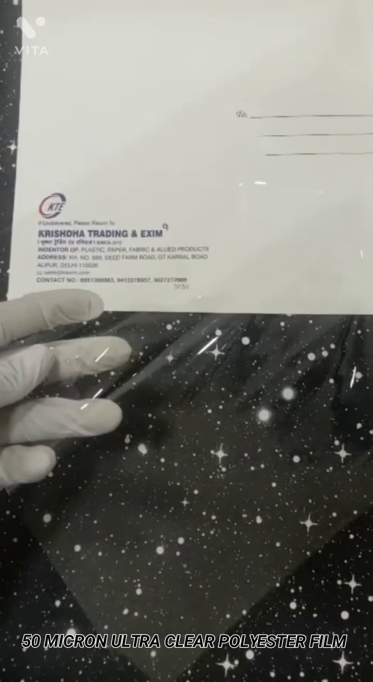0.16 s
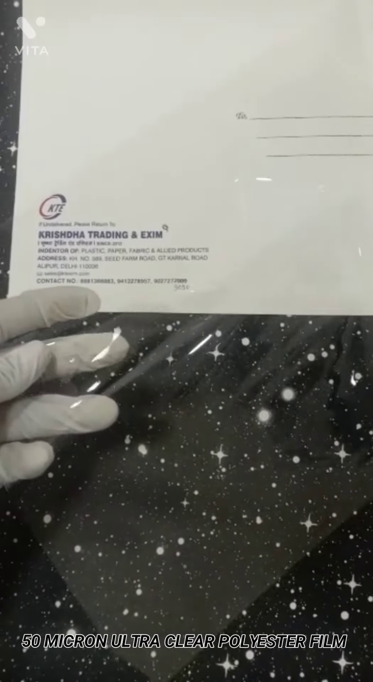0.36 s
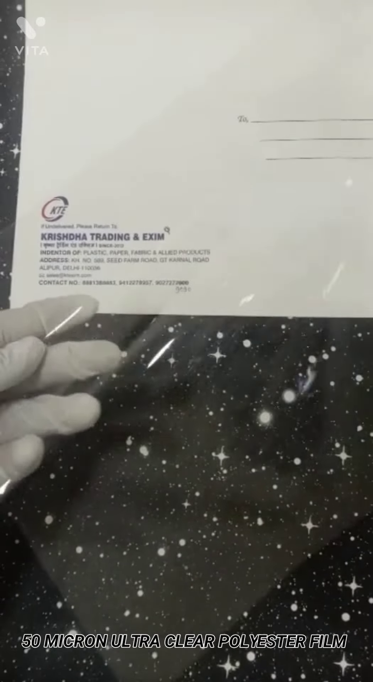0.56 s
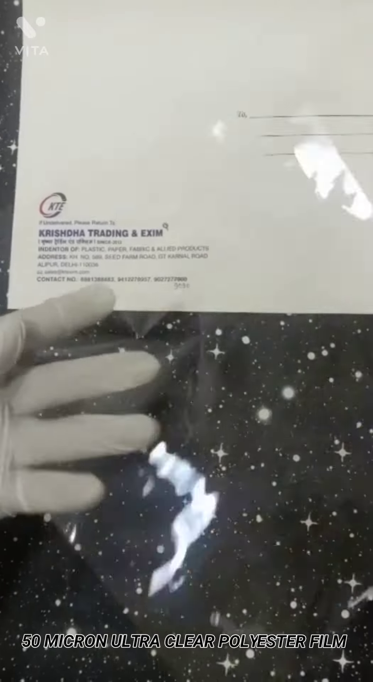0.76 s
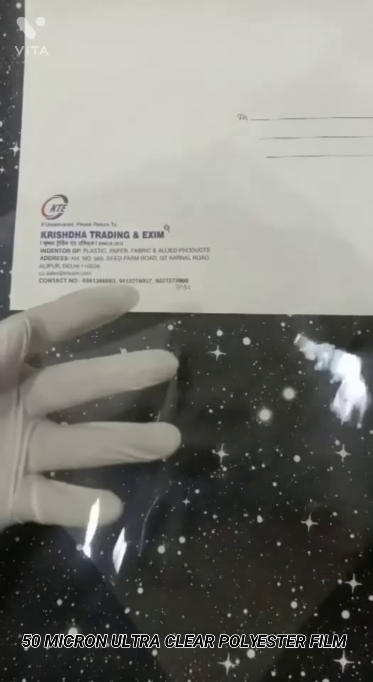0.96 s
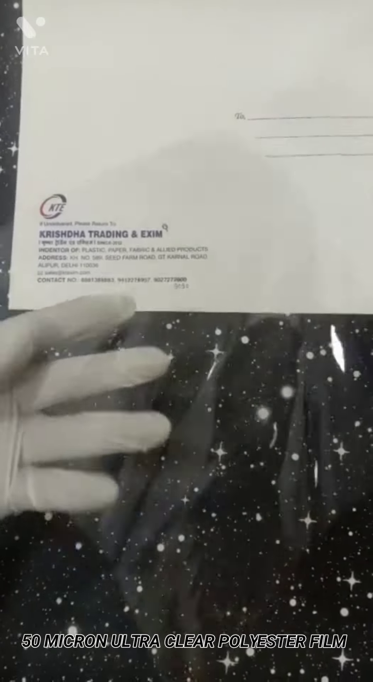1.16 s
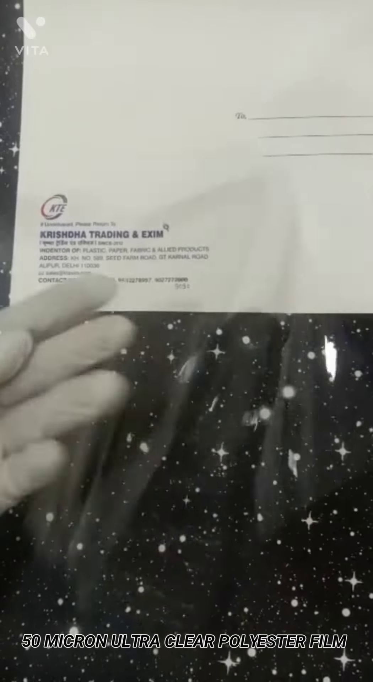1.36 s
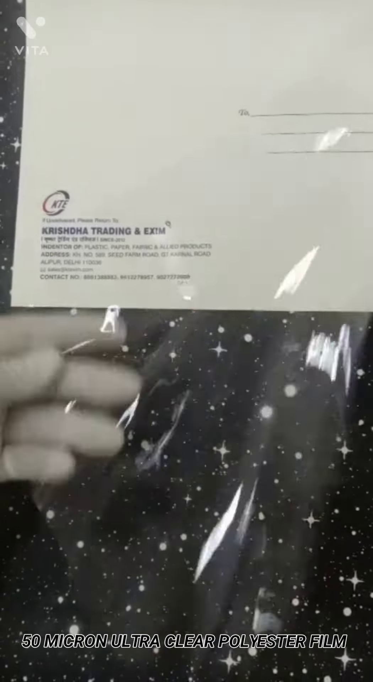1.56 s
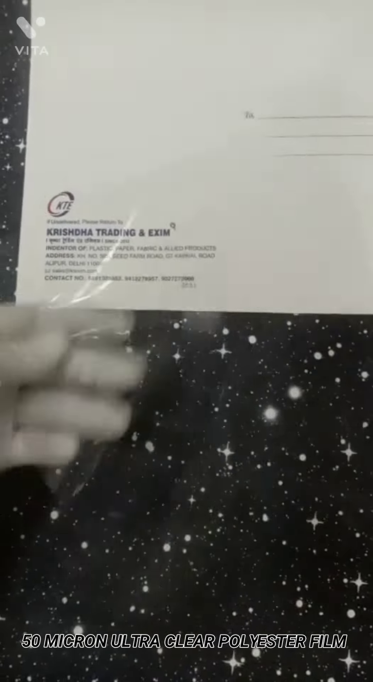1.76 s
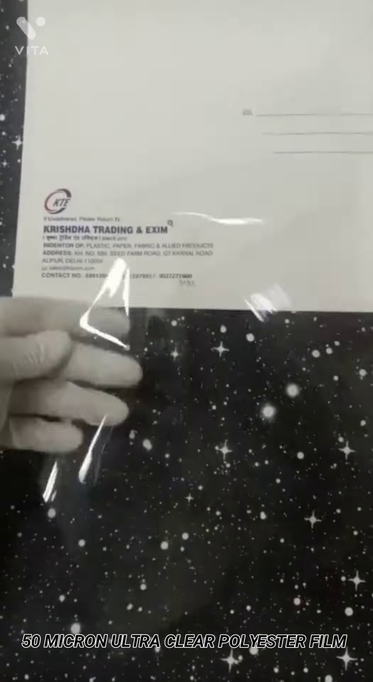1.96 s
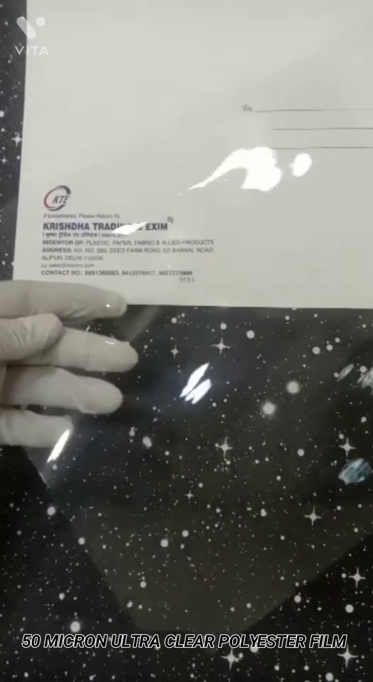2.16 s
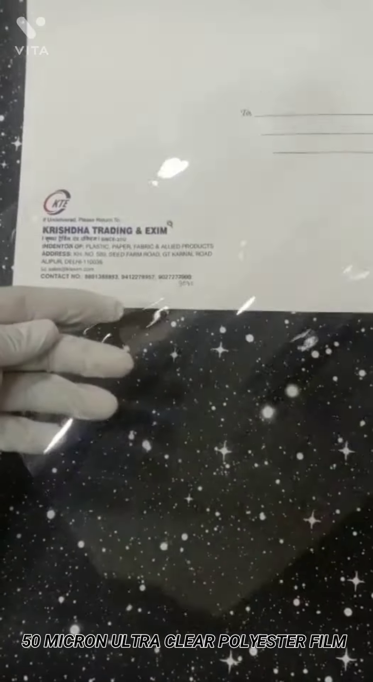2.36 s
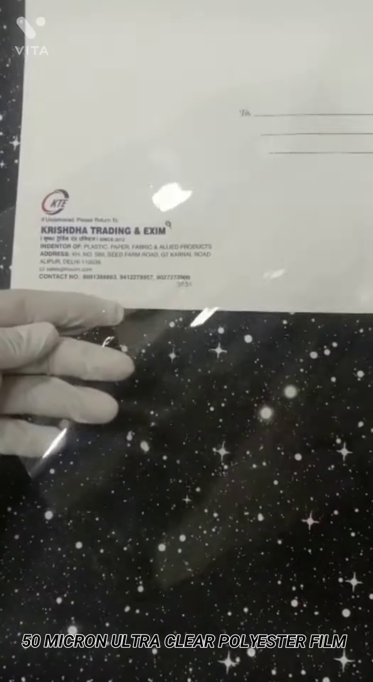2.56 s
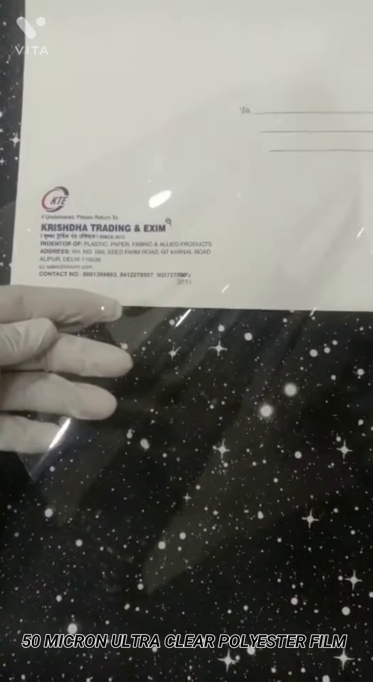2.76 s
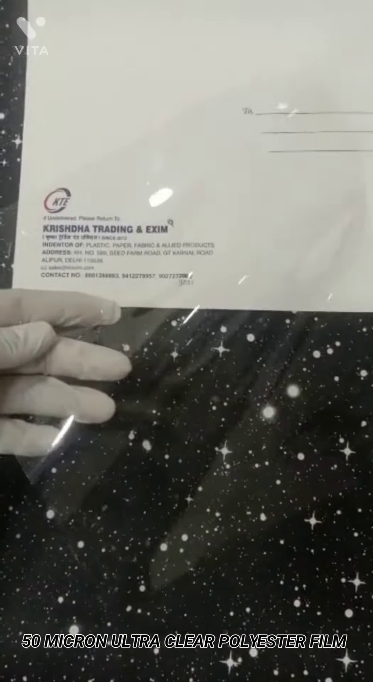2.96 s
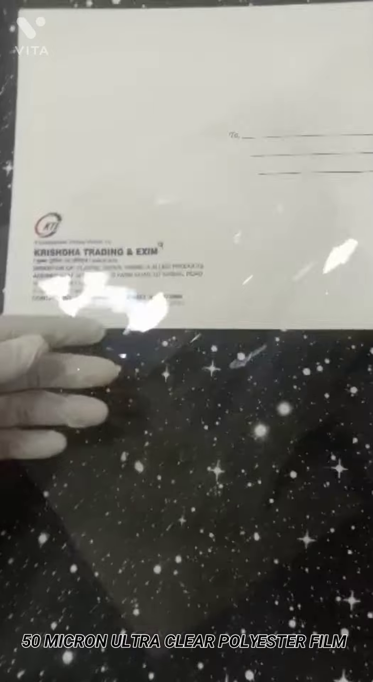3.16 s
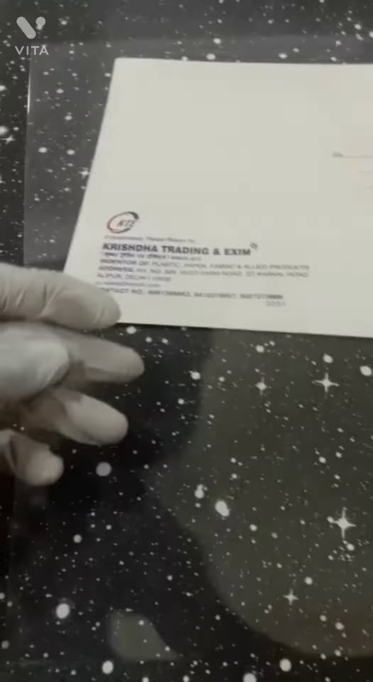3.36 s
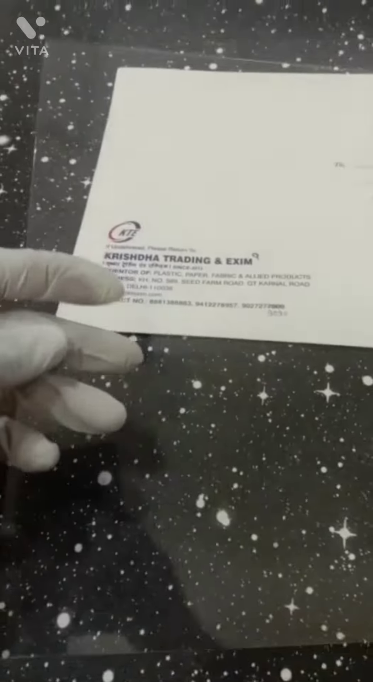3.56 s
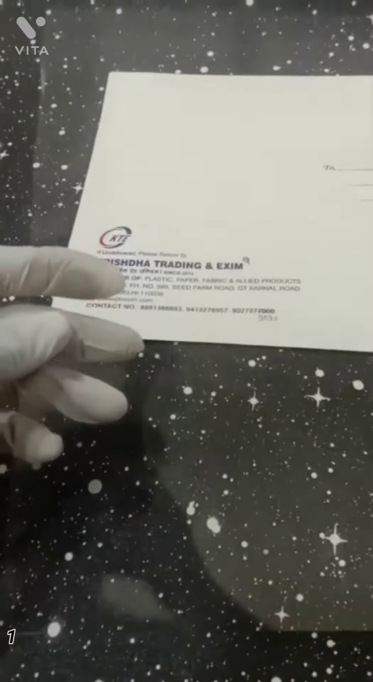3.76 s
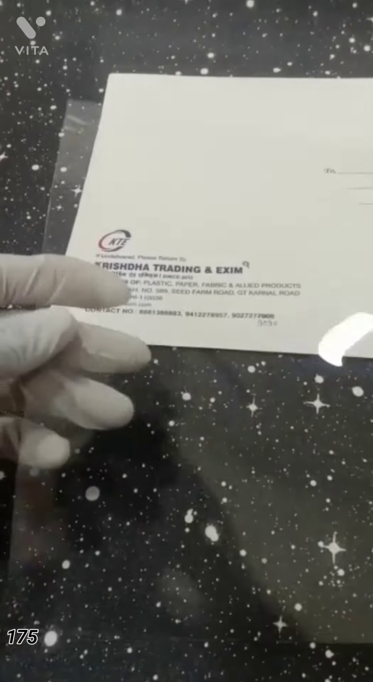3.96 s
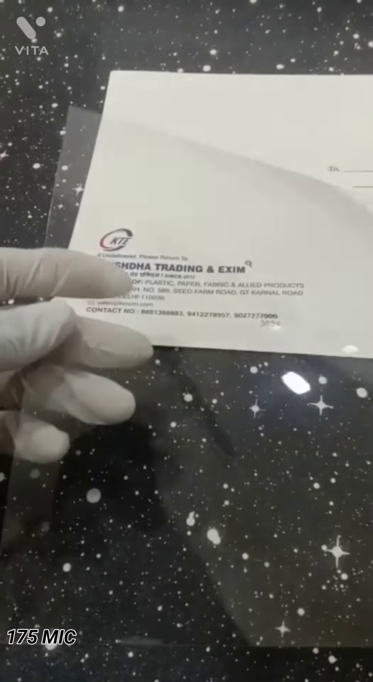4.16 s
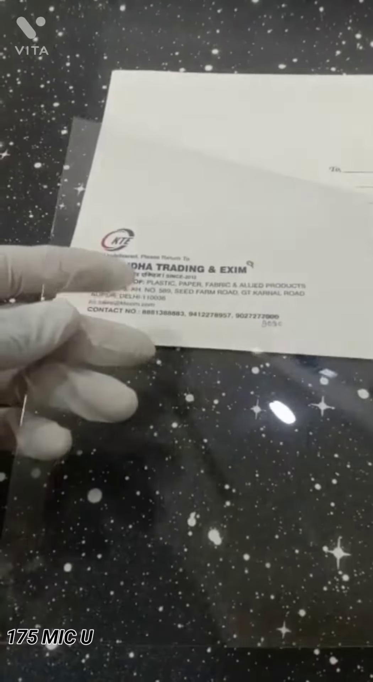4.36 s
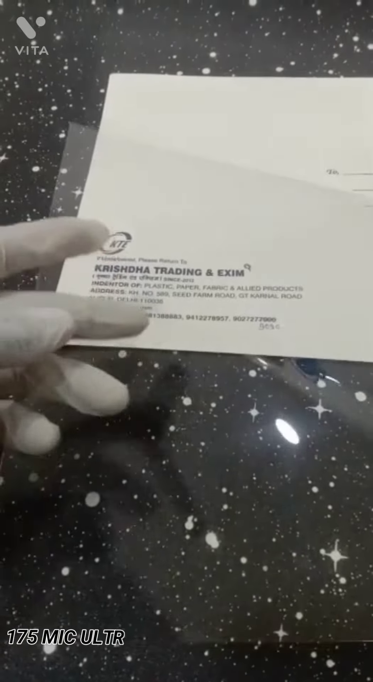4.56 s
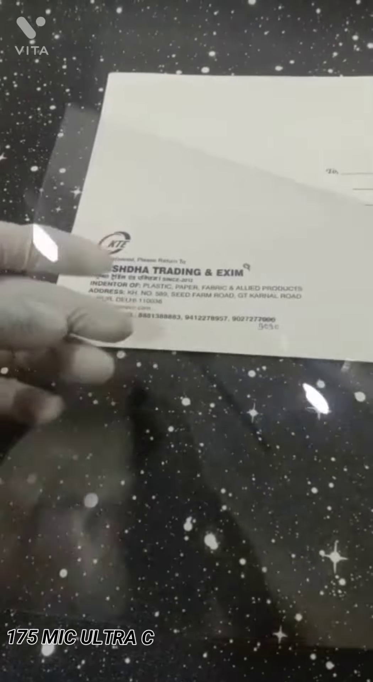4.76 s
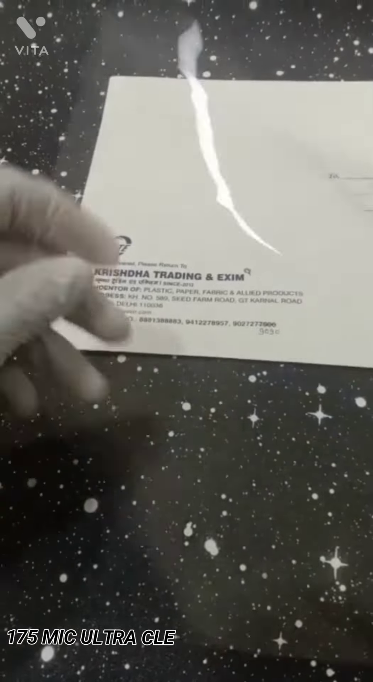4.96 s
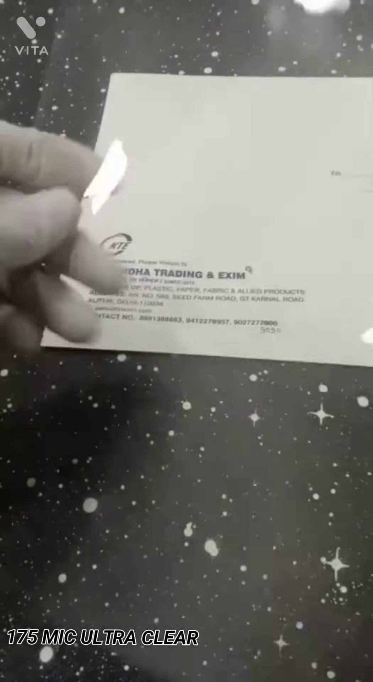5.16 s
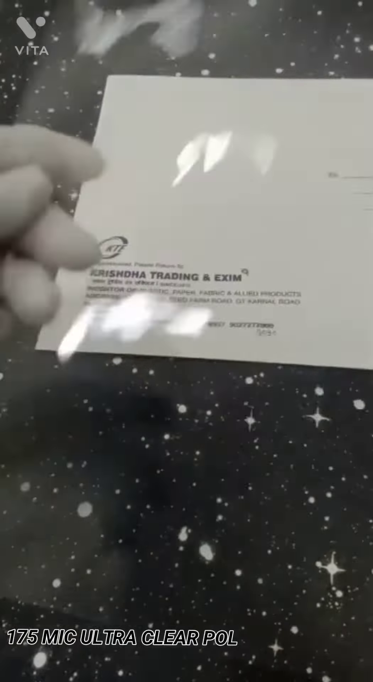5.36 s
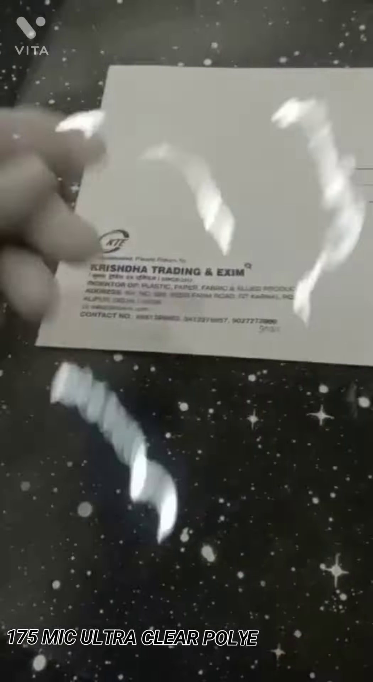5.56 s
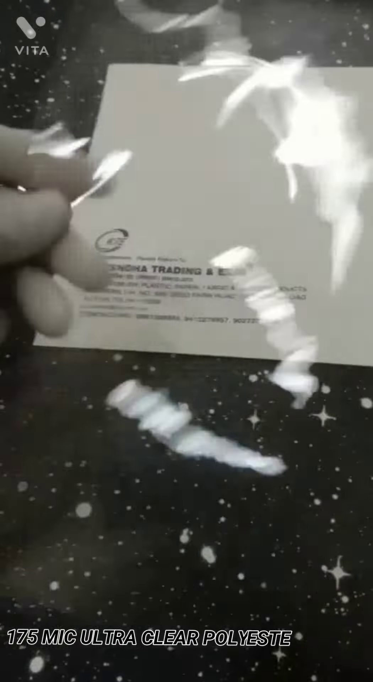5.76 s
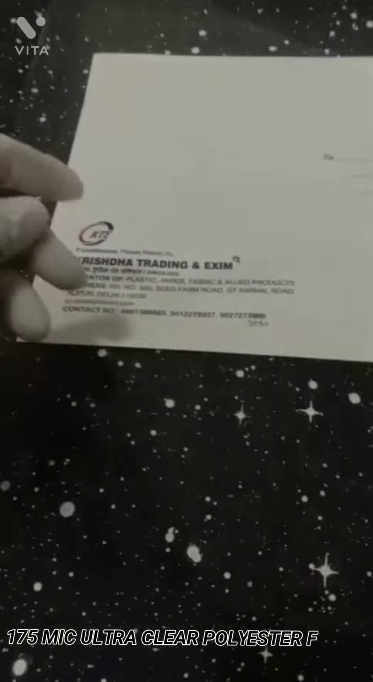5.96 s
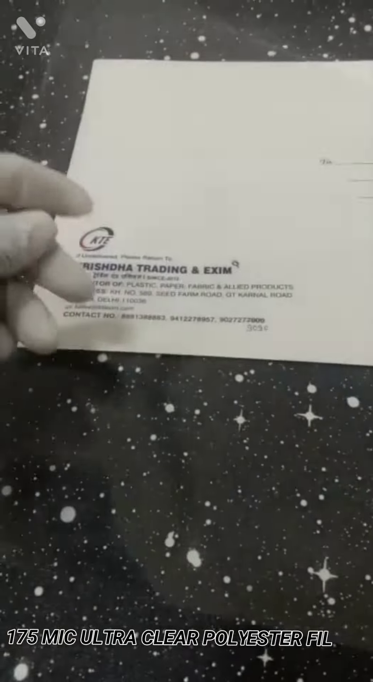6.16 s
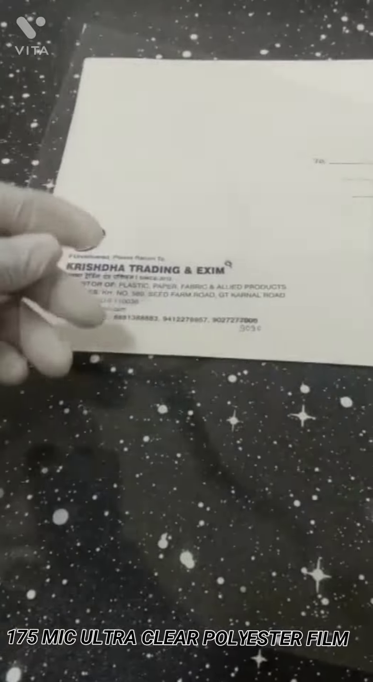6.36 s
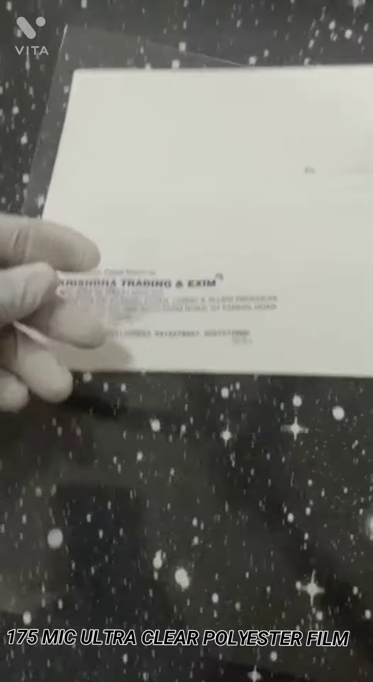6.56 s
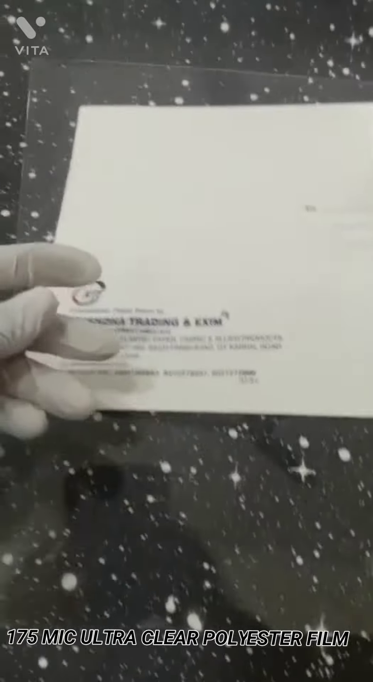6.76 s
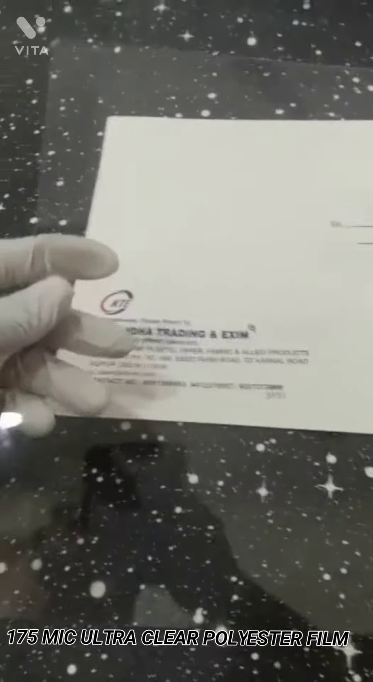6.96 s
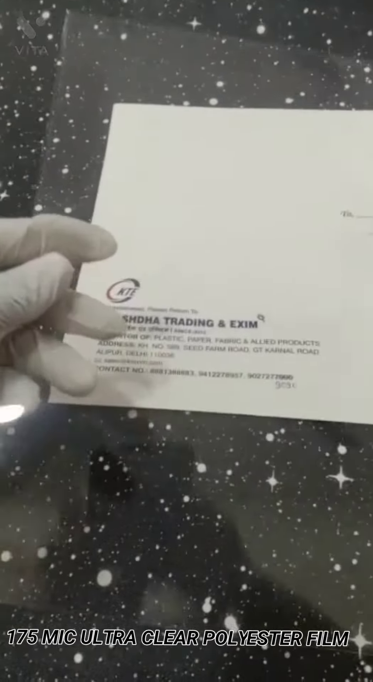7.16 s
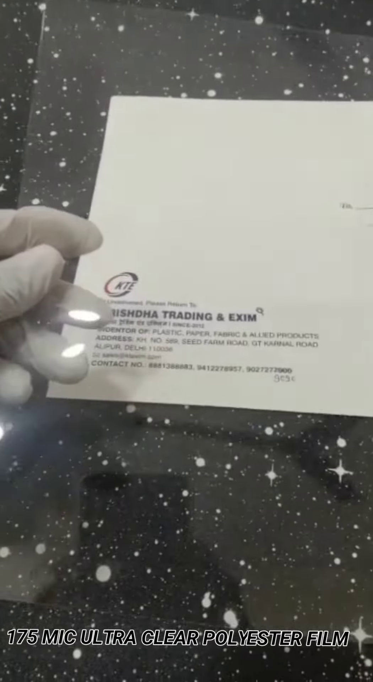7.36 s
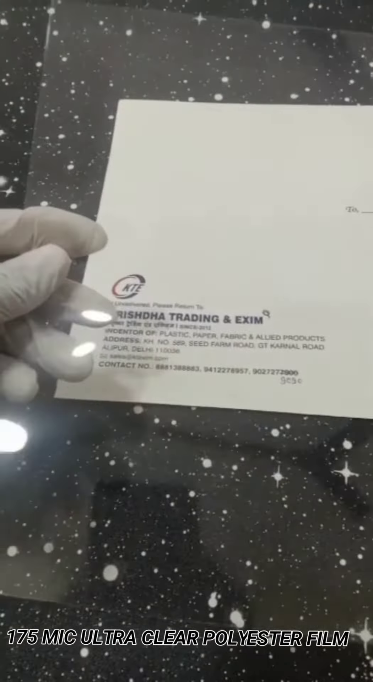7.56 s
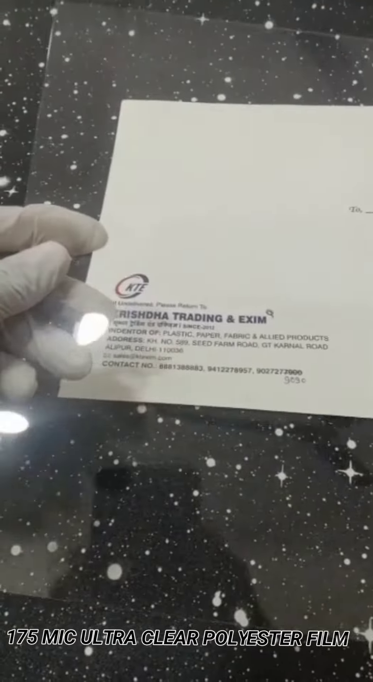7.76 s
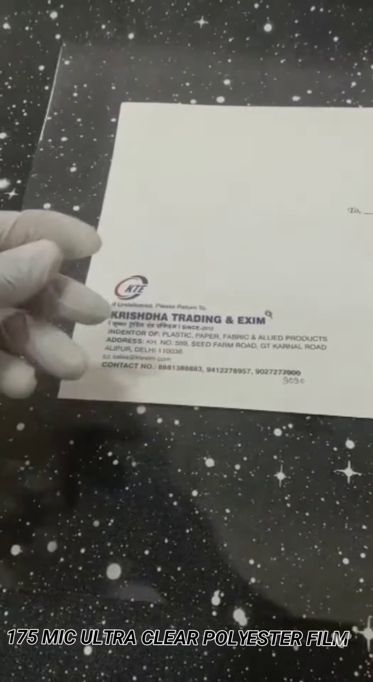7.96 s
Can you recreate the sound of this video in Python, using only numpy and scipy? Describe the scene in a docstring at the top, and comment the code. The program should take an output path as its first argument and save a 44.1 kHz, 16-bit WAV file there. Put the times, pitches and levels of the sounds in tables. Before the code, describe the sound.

Thin clear plastic film crinkles in bright snaps over a slowing engine and low rumble, then a thicker sheet buckles with loud, dull cracks.

```python
"""A gloved hand flexes clear polyester sheets in a bare, echoing room with traffic outside.
First an engine slows down over a droning rumble while a thin sheet crinkles in bright snaps of filtered
grains; after a brief silence the room fades back in, with the rumble but no engine. Fingers brush and slip
softly, then a thick sheet buckles in loud, duller cracks. Faint slips of the glove end the scene."""
import sys
import numpy as np
from scipy import signal
from scipy.fft import rfft, irfft
from scipy.io import wavfile

SR = 44100
rng = np.random.default_rng(int(sys.argv[2]) if len(sys.argv) > 2 else 0)


def dump_mix(stems):
    """Bounce the given channels to the path in sys.argv[1] as a 16-bit WAV at rate SR."""
    frames = np.atleast_2d(stems).T  # one column per channel
    limited = np.clip(frames, -1, 1)  # hard clip at full scale
    pcm = np.round(limited * 32767).astype(np.int16)
    wavfile.write(sys.argv[1], SR, pcm)


N = 353241
TIME = np.arange(N) / SR

# silence between the thin and the thick sheet: start/s, end/s
GAP_S = (3.187, 3.3)
# colour of the thin sheet: f/Hz, density/(dB per Hz)
THIN_COLOUR = [(150, -48.5), (280, -18), (540, -12), (1100, -11), (1300, -9.5), (1790, -10), (2700, -8),
               (3830, -7), (6500, -11), (8300, -18.5), (10800, -31), (13500, -36), (15500, -23)]
# colour of the thick sheet: f/Hz, density/(dB per Hz)
THICK_COLOUR = [(40, -57.5), (120, -32), (190, -24.5), (375, -13), (520, -14.5), (860, -13), (1240, -6),
                (1620, -9.5), (2440, -7.5), (3600, -13.5), (5900, -23.5), (8000, -39.5), (9800, -50.5),
                (15500, -61)]
# colour of the finest grains: f/Hz, density/(dB per Hz)
SIZZLE_COLOUR = [(5000, -31.5), (7500, 2), (10500, 1), (13500, -7), (15500, -0.5)]
# low modes of the room: f/Hz, width/Hz, level/dB
ROOM_MODES = [(126, 14, -1), (162, 12, 0), (183, 12, -3), (201, 12, 1), (245, 50, -14)]


def from_db(db):
    """Decibels to gain."""
    return 10 ** (np.asarray(db) / 20)


def rms_one(x):
    """Scale to unit power."""
    return x / np.sqrt(np.mean(x ** 2) + 1e-20)


def in_time(rows):
    """Each column of a curve at every sample."""
    s, *columns = np.transpose(rows)
    return [np.interp(TIME, s, column) for column in columns]


def at_hz(points, hz):
    """Read a table on a log-frequency axis."""
    f, value = np.transpose(points)
    return np.interp(np.log(np.maximum(hz, 1)), np.log(f), value)


def butter(x, hz, kind, order=2):
    """Butterworth filter."""
    return signal.sosfilt(signal.butter(order, hz, kind, fs=SR, output="sos"), x)


def resonate(x, modes):
    """Sum of parallel resonances (f/Hz, width/Hz, level/dB)."""
    return sum(from_db(db) * signal.lfilter(*signal.iirpeak(hz, hz / width, fs=SR), x)
               for hz, width, db in modes)


def drift(per_s, size=N):
    """Random wander of unit power, with per_s new targets a second."""
    knots = rng.standard_normal(4096)
    return rms_one(np.interp(TIME[:size] * per_s, np.arange(len(knots)), knots))


def colour(x, spectrum, tilt_db=0, hinge_hz=1500, top_hz=7500, size=4096):
    """Causal minimum-phase filter; between hinge and top the spectrum tilts by tilt_db per kHz."""
    hz = np.arange(size // 2 + 1) * SR / size
    tilt = tilt_db * (np.clip(hz, hinge_hz, top_hz) - hinge_hz) / 1000
    cepstrum = irfft(np.log(from_db(at_hz(spectrum, hz) + tilt)))
    # folding the cepstrum onto positive time gives minimum phase
    cepstrum[1:size // 2] *= 2
    cepstrum[size // 2 + 1:] = 0
    impulse_response = irfft(np.exp(rfft(cepstrum)))
    return signal.fftconvolve(x, impulse_response)[:len(x)]


def add(track, s, sound):
    """Mix a sound in at time s."""
    start = max(round(s * SR), 0)
    track[start:start + len(sound)] += sound[:N - start]


def swell(s, rise, fall):
    """A bell-shaped rise to 1 at time s, then an exponential fall."""
    steepness = np.where(TIME < s, ((TIME - s) / rise) ** 2, (TIME - s) / fall)
    return np.exp(-np.minimum(steepness, 30))


def late_swell(t, peak_s):
    """A rise to 1 at peak_s, then a slower decay."""
    return t / peak_s * np.exp(1 - t / peak_s)


def grains(per_s, spread_db, size):
    """Tiny creases give way at random times, with random strength and sign."""
    strength = from_db(spread_db * np.minimum(rng.exponential(1, size), 3))
    sign = rng.choice([-1, 1], size)
    return strength * sign * (rng.random(size) < per_s / SR)


def background(hiss_db=-69.0, early_whine_db=-68.0, late_whine_db=-82.5, waver_db=7.0):
    """Coloured room hiss with a faint whine: wavering noise bands, stronger before the gap."""
    # colour of the quiet room: f/Hz, density/(dB per Hz)
    hiss_colour = [(18, -54.5), (30, -17.5), (123, -1.5), (520, -11), (760, -19), (1260, -21), (1680, -27),
                   (3590, -22.5), (6890, -46.5), (9000, -52.5), (15500, -46.5)]
    # bands of the whine: f/Hz, width/Hz, level/dB
    whine_modes = [(1270, 47, 3.5), (1860, 70, -4), (2570, 160, -4.5), (3470, 180, -7.5)]
    hiss = rms_one(colour(rng.standard_normal(N), hiss_colour))
    air = rng.standard_normal(N)
    whine = sum(resonate(air, [mode]) * from_db(waver_db * drift(35)) for mode in whine_modes)
    whine_db = np.where(TIME < GAP_S[0], early_whine_db, late_whine_db)
    return from_db(hiss_db) * hiss + from_db(whine_db) * butter(rms_one(whine), 4500, "low")


def rumble(early_db=-48.5, late_trim_db=-0.5, lumps_db=4.0):
    """Uneven low noise: steady on average before the gap, then rising and sinking."""
    # colour of the rumble: f/Hz, density/(dB per Hz)
    rumble_colour = [(30, -27), (65, -17), (95, -9.5), (125, 1.5), (143, 1), (165, -0.5), (215, -9),
                     (280, -12.5), (420, -18), (650, -30), (2000, -56.5)]
    # rise and fall after the gap, before the trim: t/s, level/dB
    late_levels = [(3.32, -56.5), (3.94, -47), (4.02, -54), (4.7, -60.5), (5.6, -54.5), (6.06, -52.5),
                   (6.25, -62), (7.1, -53.5), (7.35, -70.5), (7.54, -55.5), (8.0, -84.5)]
    average_db = np.where(TIME < GAP_S[0], early_db, in_time(late_levels)[0] + late_trim_db)
    level_db = average_db + lumps_db * np.tanh(drift(12))
    return from_db(level_db) * rms_one(colour(rng.standard_normal(N), rumble_colour))


def drone(drone_hz=77, drone_waver=0.011, trim_db=1.0):
    """A deep sine outside, slightly unsteady in pitch, comes in swells."""
    # swells, before the trim: t/s, level/dB, half length/s
    swells = [(0.15, -66, 0.077), (0.548, -54.5, 0.28), (1.5, -53.5, 0.32), (2.3, -49.5, .26)]
    pitch = drone_hz * (1 + drone_waver * drift(1.4))
    tone = np.sqrt(2) * np.sin(2 * np.pi * np.cumsum(pitch) / SR)
    return tone * sum(from_db(db + trim_db) / (1 + np.abs((TIME - s) / half) ** 6)
                      for s, db, half in swells)


def engine(waver=0.0032, lumps_db=1.5):
    """Harmonics of a slowing engine swell as they slide through the room's low modes."""
    # engine outside: t/s, rate/(cycles per s), level/dB
    speed_curve = [(0, 37.3, -49), (.45, 31.5, -49.5), (.7, 37.2, -34), (1, 37, -48.5), (1.2, 29.7, -41.5),
                   (1.55, 28.3, -39.5), (1.9, 28.8, -47), (2.55, 22.8, -48.5), (3.2, 23.2, -56)]
    rate, level_db = in_time(speed_curve)
    turn = 2 * np.pi * np.cumsum(rate * (1 + waver * drift(18))) / SR
    harmonics = np.zeros(N)
    for k in range(4, 12):
        response = sum(from_db(db) / np.hypot(1, 2 * (k * rate - hz) / width) ** 2
                       for hz, width, db in ROOM_MODES)
        harmonics += response * np.sin(k * turn + rng.uniform(0, 2 * np.pi))
    return from_db(level_db + lumps_db * drift(28)) * harmonics


def traffic():
    """Engine and drone sound before the gap only, over the rumble."""
    return (TIME < GAP_S[0]) * (engine() + drone()) + rumble()


def glove_brushes(size=16384):
    """Soft fingertips brush the sheet: dull noise in short swells."""
    # brushes: t/s, level/dB, time to peak/s
    strokes = [(0.382, -50.5, 0.015), (3.715, -51, 0.024), (4.037, -48.5, 0.047), (4.53, -74, .02),
               (4.804, -56, 0.027), (4.937, -49, 0.068)]
    # colour of a brush: f/Hz, density/(dB per Hz)
    brush_colour = [(150, -1.5), (350, 1), (700, 5), (1050, 8), (1500, -13), (4000, -37.5)]
    out, t = np.zeros(N), np.arange(size) / SR
    for s, db, peak_s in strokes:
        noise = rms_one(colour(rng.standard_normal(size), brush_colour))
        add(out, s, from_db(db) * late_swell(t, peak_s) * noise)
    return out


def glove_slips(edge_s=0.015, top_hz=6800, grip_spread_db=4.0, flicker_db=4.0, flicker_per_s=45,
                size=16384):
    """The glove slips in tiny jerks that excite faint squeaking resonances."""
    # slips: t/s, level/dB, length/s
    slips = [(0.406, -52.5, 0.048), (3.427, -59, 0.13), (4.433, -58, .13), (4.803, -51, 0.038),
             (4.895, -56, 0.07), (5.029, -47.5, 0.058), (6.438, -53.5, 0.056), (6.654, -52, 0.067),
             (6.737, -49.5, 0.073), (7.047, -52.5, 0.045), (7.442, -54.5, 0.096)]
    # average squeak resonances: f/Hz, width/Hz, level/dB
    squeak_modes = [(1190, 380, 2.5), (2150, 400, 2), (2800, 500, -2.5), (3650, 540, 0.5), (4260, 260, -2),
                    (5030, 400, -8), (5580, 340, -6), (6130, 550, -4)]
    out, t = np.zeros(N), np.arange(size) / SR
    for s, db, length in slips:
        stroke = (1 - np.exp(-t / edge_s)) * np.exp(-(t / length) ** 2)
        jerks, squeak = grains(3200, 0.98, size), 0
        # each grip favours other resonances, and they flicker as the finger moves
        for hz, width, mode_db in squeak_modes:
            grip_db = mode_db + grip_spread_db * rng.standard_normal()
            flickering_db = grip_db + flicker_db * drift(flicker_per_s, size=size)
            ring = resonate(jerks, [(hz, width, flickering_db)])
            squeak = squeak + resonate(ring, [(hz, width, 0)])
        add(out, s, from_db(db) * stroke * rms_one(butter(squeak, top_hz, "low", order=6)))
    return out


def glove_bumps(size=16384):
    """Soft bumps of the hand boom as sines at the first two room modes."""
    # bumps: t/s, level/dB, time to peak/s
    bumps = [(0.27, -36, 0.033), (1.03, -33, 0.01), (2.45, -35.5, 0.091), (2.56, -42, 0.057),
             (2.89, -33, 0.021), (2.98, -37, 0.026), (3.82, -42, 0.044), (4.13, -46, .025), (4.5, -48, .04),
             (5.07, -44, .015), (6.44, -49, .04), (6.987, -35.5, 0.045)]
    out, t = np.zeros(N), np.arange(size) / SR
    boom = sum(np.sin(2 * np.pi * hz * t) * from_db(db) for hz, width, db in ROOM_MODES[:2])
    for s, db, peak_s in bumps:
        add(out, s, from_db(db) * late_swell(t, peak_s) * boom / 2)
    return out


def fine_sizzle(per_s=4000, spread_db=2.5):
    """A high haze of the finest grains, in short swells."""
    # swells: t/s, level/dB, length/s
    swells = [(0.616, -73, 0.037), (1.014, -67.5, .025), (1.102, -59, 0.013), (1.289, -59.5, 0.055),
              (4.957, -73, 0.011), (5.058, -72.5, .025), (5.426, -67.5, .025), (6.013, -57.5, .035),
              (6.71, -74.5, .04), (6.82, -75.5, 0.024)]
    haze = rms_one(colour(grains(per_s, spread_db, N), SIZZLE_COLOUR))
    return haze * sum(from_db(db) * swell(s, length, length / 2) for s, db, length in swells)


def pings(per_s, spread_db, cycles=9, count=9):
    """Tiny facets flip one by one, each ringing briefly at one of a few pitches."""
    flips, dealt = grains(per_s, spread_db, N), rng.integers(0, count, N)
    out = np.zeros(N)
    for k, hz in enumerate(np.geomspace(800, 6000, count)):
        own_flips = flips * (dealt == k) + 1e-18   # the offset keeps the filter from stalling
        out += resonate(own_flips, [(hz, hz / cycles, 0)]) / np.sqrt(hz)
    return rms_one(out)


def rustle(flexes, spectrum, per_s, spread_db, flutter_db, body_db, treble_db, tilt_db,
           pings_per_s, ping_db, ping_spread_db):
    """Small creases, pings and sliding friction swell per flex, each with its own treble balance."""
    creases = rms_one(grains(per_s, spread_db, N)) * from_db(flutter_db * drift(70))
    friction = rng.standard_normal(N) / np.sqrt(2)
    facets = from_db(ping_db) * pings(pings_per_s, ping_spread_db)
    film = colour(creases + friction + facets, spectrum, tilt_db)
    body = from_db(body_db) * rms_one(butter(film, 1500, "low", order=3))
    treble = from_db(treble_db) * rms_one(butter(film, 2500, "high", order=3))
    return sum(from_db(db) * swell(s, rise, fall) * (body + from_db(bright_db) * treble)
               for s, db, bright_db, rise, fall in flexes)


def crease(s, treble_db, decay, force, tilt_per_db=0.28, sizzle_follows=2.1, sizzle_per_halving_db=5,
           usual_decay_s=0.0031, facet_width_hz=260, facet_db=5.5, edge_hz=6800):
    """A force rings the facets beside a fold; tighter, quicker folds are brighter and sizzle more."""
    if s < GAP_S[0]:
        spectrum, usual_db, sizzle_db, top_hz = THIN_COLOUR, 0.0, -23, 17000
    else:
        spectrum, usual_db, sizzle_db, top_hz = THICK_COLOUR, -7.0, -52, 11500
    tight_db = treble_db - usual_db
    sizzle_db += sizzle_follows * tight_db + sizzle_per_halving_db * np.log2(usual_decay_s / decay)
    facet_hz = np.exp(rng.uniform(np.log(900), np.log(6500), size=4))
    facets = [(hz, facet_width_hz, facet_db) for hz in facet_hz]
    ring = colour(force + resonate(force, facets), spectrum, tilt_per_db * tight_db)
    ring = rms_one(butter(ring, edge_hz, "low", order=10))
    sizzle = rms_one(butter(colour(force, SIZZLE_COLOUR), top_hz, "low", order=4))
    # the ring gets unit power over its decay time; the sizzle adds to it
    return (ring + from_db(sizzle_db) * sizzle) * np.sqrt(decay * SR / len(force))


def snaps(trim_db=0.5, rise_s=0.0004, per_s=12000, spread_db=2.5, shortest_s=0.001, size=8192):
    """A crease flips: a quick avalanche of grains that dies away."""
    # snaps, before the trim: t/s, level/dB, treble re body/dB, decay/s (raised to shortest_s)
    flips = [(0.49, -30, -8, .003), (0.582, -21.5, 1.5, 0.0018), (0.698, -23, 2, 0.0034),
             (1.147, -38, -1.5, 0.009), (1.178, -37, -2.5, 0.0038), (1.305, -29.5, 4.5, 0.0026),
             (1.358, -27.5, -1, 0.0024), (1.392, -23, 1.5, 0.0033), (1.405, -23, -3.5, 0.0055),
             (1.464, -17, 4, 0.0015), (1.481, -17.5, -5.5, 0.0042), (1.494, -14.5, 3, 0.0011),
             (1.575, -29, 6, .004), (1.616, -19.5, 0, 0.0011), (1.668, -23.5, 5, 0.0056),
             (1.727, -16.5, 3.5, 0.0049), (1.777, -16.5, 2.5, 0.0021), (1.906, -25.5, 5, 0.0023),
             (2.512, -41.5, -5.5, 0.0017), (2.592, -38, -3.5, .004), (3.005, -52, 1.5, .006),
             (3.016, -31, -1.5, .005), (4.946, -56, -10.5, .003), (5.086, -12, -8, 0.0075),
             (5.429, -14, -4, 0.012), (5.474, -17, -8, 0.004), (5.583, -13.5, -5, 0.012),
             (5.614, -14, 2, 0.01), (5.6975, -9, 5.5, .0014), (5.708, -4.5, 0, 0.00086),
             (5.815, -17.5, 0, 0.0047), (5.862, -20, -1, 0.0044), (5.999, -17.5, -10, .005)]
    out, t = np.zeros(N), np.arange(size) / SR
    for s, db, treble_db, decay in flips:
        decay = max(decay, shortest_s)
        avalanche = (1 - np.exp(-t / rise_s)) * np.exp(-t / decay)
        force = grains(per_s, spread_db, size) * avalanche
        add(out, s, from_db(db + trim_db) * crease(s, treble_db, decay, force))
    return out


def buckles(trim_db=-2.0, thin_roll_s=0.009, thick_roll_s=0.0057, per_s=5000, spread_db=2.0, size=8192):
    """A bulge rolls over: grains swell as the fold travels, faster in the stiff sheet, then die."""
    # buckles, before the trim: t/s, level/dB, treble re body/dB
    bulges = [(0.475, -36, -13.5), (0.763, -29.5, -3.5), (0.778, -26, -16), (0.96, -38.5, -12),
              (1.161, -31.5, -9.5), (1.452, -16, -2.5), (1.487, -29.5, -15), (1.57, -16, 4),
              (1.585, -31, -15), (1.657, -19, -5), (1.689, -18, 2), (1.738, -17.5, -5.5), (1.848, -21, 6),
              (1.864, -19.5, 0), (1.893, -15, -4.5), (1.94, -24, -5), (2.235, -32, -14), (3.031, -40, -23),
              (3.153, -41, -13), (5.058, -18, -36), (5.067, -20.5, -36.5), (5.102, -10, -26.5),
              (5.222, -11.5, -27.5), (5.235, -16.5, -36), (5.279, -14, -20.5), (5.293, -13, -23),
              (5.397, -11, -14), (5.44, -21.5, -13), (5.491, -15, -7), (5.609, -10.5, -6.5),
              (5.642, -15.5, -1), (5.779, -12.5, -5), (5.84, -10.5, -22), (5.879, -18, -5.5),
              (6.012, -15.5, -24.5), (6.077, -23, -31)]
    out, t = np.zeros(N), np.arange(size) / SR
    for s, db, treble_db in bulges:
        roll = thin_roll_s if s < GAP_S[0] else thick_roll_s
        force = grains(per_s, spread_db, size) * t / roll * np.exp(-t / roll)
        add(out, s, from_db(db + trim_db) * crease(s, treble_db, roll, force))
    return out


def cracks():
    """Snaps and buckles of both sheets, without the deepest bass."""
    return butter(snaps() + buckles(), 84, "high")


def room(x, build_s=0.0025, ring_hz=1260, ring_width_hz=90, ring_db=-6.0, ring_t60_s=1.2, size=49152):
    """Diffuse echo: noise bands build up quickly and die at their own rates; a narrow band rings on."""
    # decay of the echo: f/Hz, t60/s
    decay_times = [(150, 0.23), (500, 1), (1300, 0.95), (3500, 0.47), (7000, .7), (15000, 0.53)]
    t, echo = np.arange(size) / SR, np.zeros(size)
    edges = np.geomspace(100, 16000, 9)
    for low, high in zip(edges, edges[1:]):
        t60 = at_hz(decay_times, np.sqrt(low * high))
        echo += butter(rng.standard_normal(size), [low, high], "band") * from_db(-60 * t / t60)
    ring = resonate(rng.standard_normal(size), [(ring_hz, ring_width_hz, ring_db)])
    echo += ring * from_db(-60 * t / ring_t60_s)
    echo *= 1 - np.exp(-t / build_s)
    return signal.fftconvolve(x, echo / np.sqrt(np.sum(echo ** 2)))[:N]


def scene(crack_echo_db=-7.0, rustle_echo_db=-11.5):
    """Both sheets and the glove, dry and echoing in the room, with traffic behind."""
    # flexes of the hand: peak t/s, level/dB, treble re body/dB, rise/s, fall/s
    flexes = [(0.52, -44.5, -17, .05, .12), (0.62, -49, 2.5, 0.038, 0.025), (0.79, -47.5, 1.5, 0.1, 0.36),
              (1.42, -42.5, 2.5, .09, .1), (1.62, -38.5, 16.5, .07, .12), (1.92, -37.5, 6.5, .1, 0.085),
              (2.031, -39, -2, 0.04, .15), (2.58, -55.5, 0, .07, .06), (3.05, -51, -5, .04, .1),
              (3.51, -60.5, -0.5, .05, .12), (4.4, -68, 0, .3, .1), (4.95, -54, -13, .04, .1),
              (5.43, -25, -7.5, 0.046, .18), (5.85, -31.5, 15.5, .22, .13), (6.02, -25, -10, .1, .17),
              (6.46, -73, -13.5, .04, .07), (6.69, -64, -2.5, 0.016, 0.04), (6.8, -53, -16.5, 0.058, 0.028)]
    thin = rustle([f for f in flexes if f[0] < GAP_S[0]], THIN_COLOUR, per_s=730, spread_db=0.5,
                  flutter_db=1.0, body_db=2.0, treble_db=-3.5, tilt_db=-3.5,
                  pings_per_s=390, ping_db=-8.0, ping_spread_db=5.5)
    thick = rustle([f for f in flexes if f[0] > GAP_S[0]], THICK_COLOUR, per_s=1800, spread_db=-0.5,
                   flutter_db=1.5, body_db=-2.0, treble_db=-9.5, tilt_db=-1.0,
                   pings_per_s=1000, ping_db=-7.0, ping_spread_db=1.5)
    glove = glove_brushes() + glove_slips() + glove_bumps()
    soft = thin + thick + fine_sizzle() + glove
    sharp = cracks()
    echo = room(from_db(crack_echo_db) * sharp + from_db(rustle_echo_db) * soft)
    return (background() + traffic() + soft + sharp + echo)[None]


def record(dry, fade_s=0.11, cutoff_hz=15800):
    """Fixed peaks colour everything; all cuts to silence and fades back in; soft clipping, steep low-pass."""
    # fixed peaks that colour the whole sound: f/Hz, width/Hz, gain at the centre/dB
    fixed_peaks = [(374, 18, 2), (467, 10, 1), (1115, 140, -1), (1263, 75, 7), (1560, 45, 1),
                   (1852.5, 14, 1.5), (2288, 60, 1), (2680, 190, 2), (3666, 190, 4.5), (4985, 140, 4),
                   (5470, 130, 3.5), (6484, 700, 0.5), (15400, 720, 6)]
    x = dry
    for hz, width, db in fixed_peaks:
        x = x + (from_db(db) - 1) * resonate(x, [(hz, width, 0)])
    fade_in = np.clip((TIME - GAP_S[1]) / fade_s, 0, 1)
    x = x * np.where(TIME < GAP_S[0], 1, fade_in)
    low_pass = signal.ellip(10, .2, 80, cutoff_hz, fs=SR, output="sos")
    return signal.sosfilt(low_pass, np.tanh(x))


dry = scene()
out = record(dry)
dump_mix(out)
```